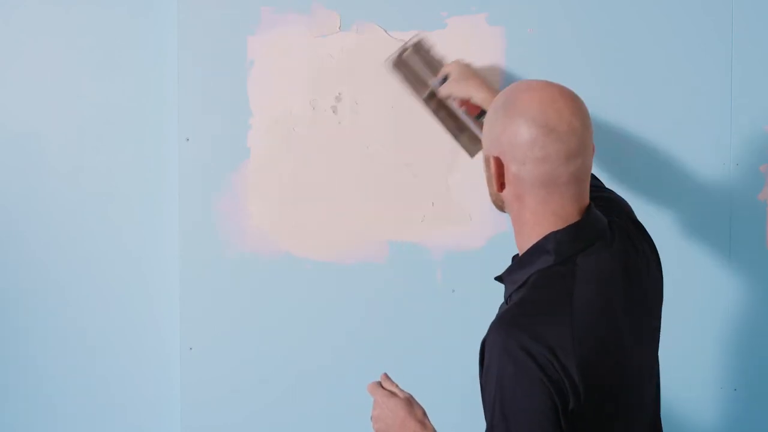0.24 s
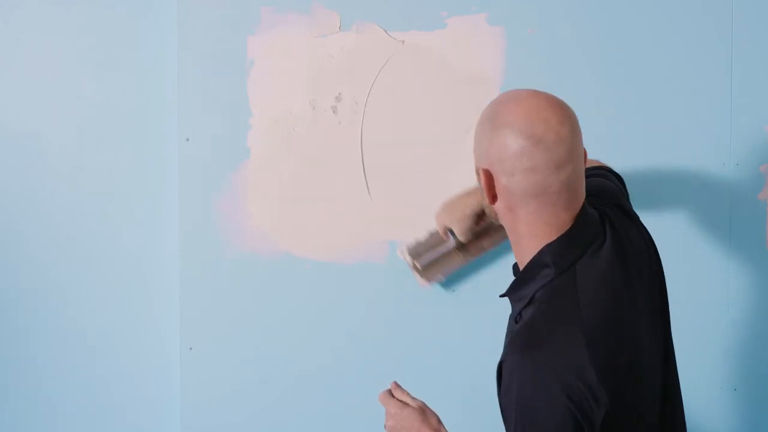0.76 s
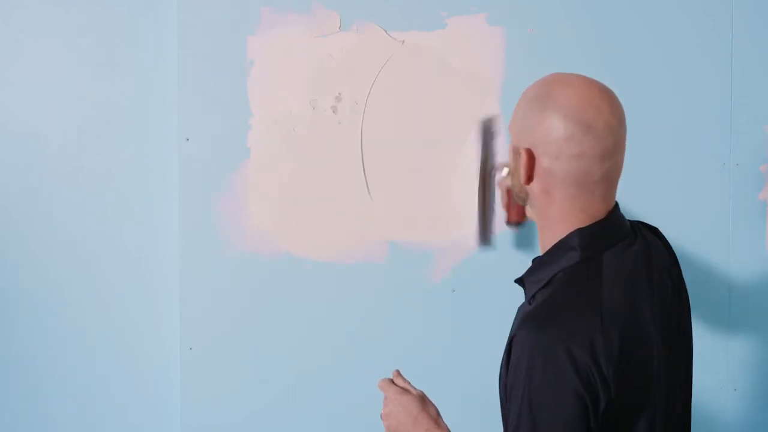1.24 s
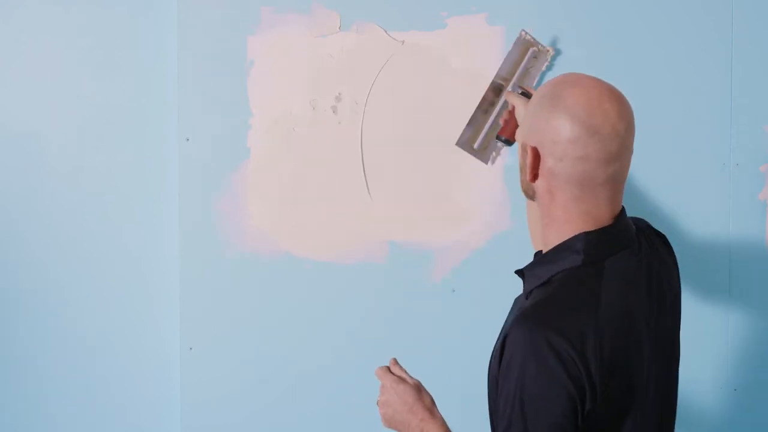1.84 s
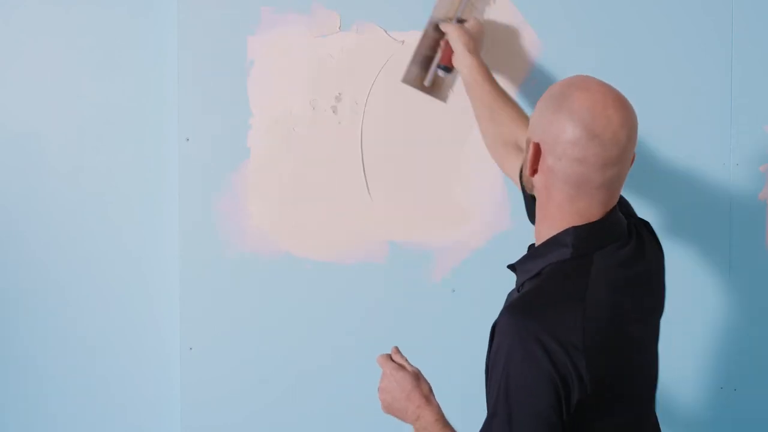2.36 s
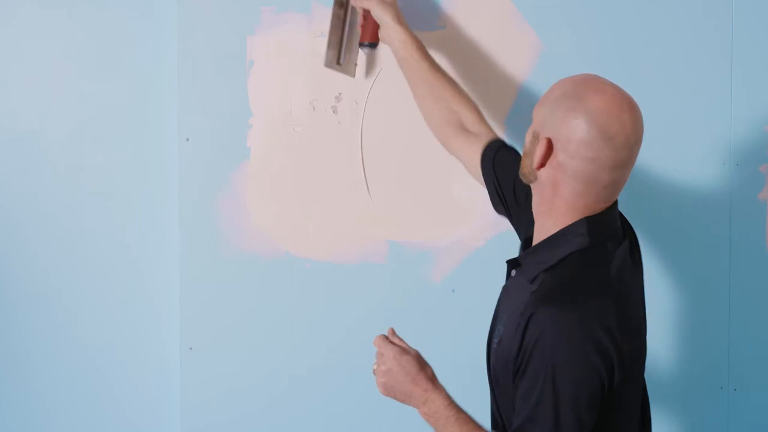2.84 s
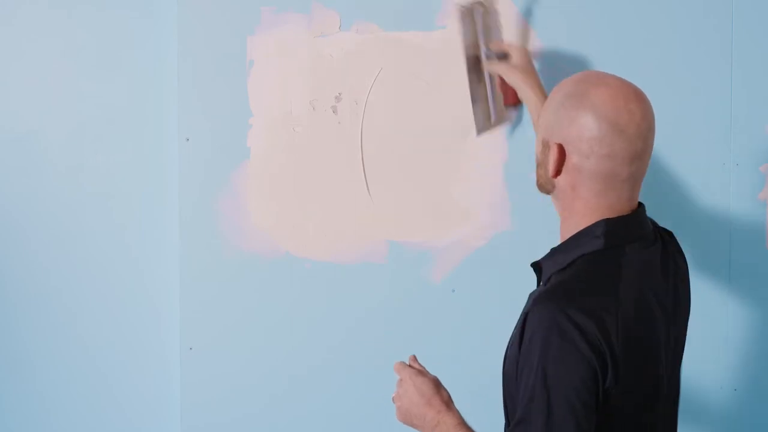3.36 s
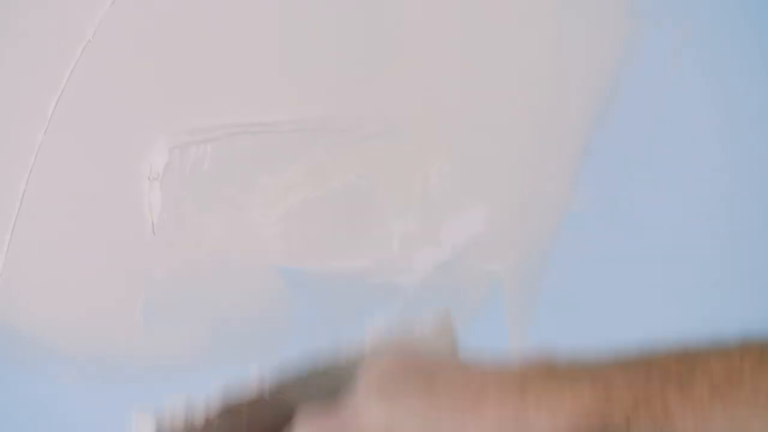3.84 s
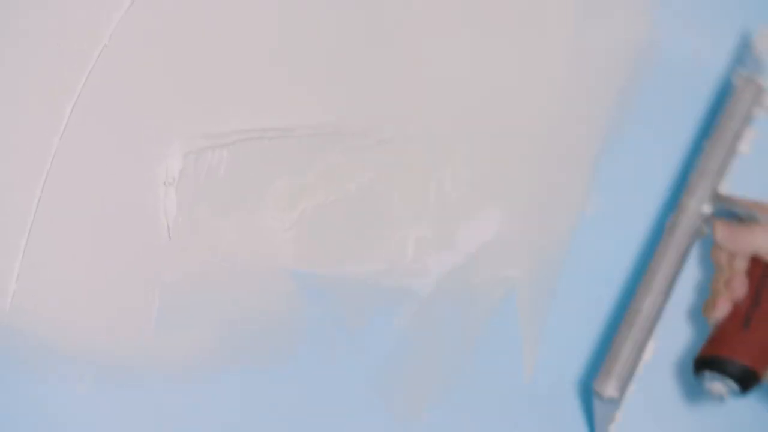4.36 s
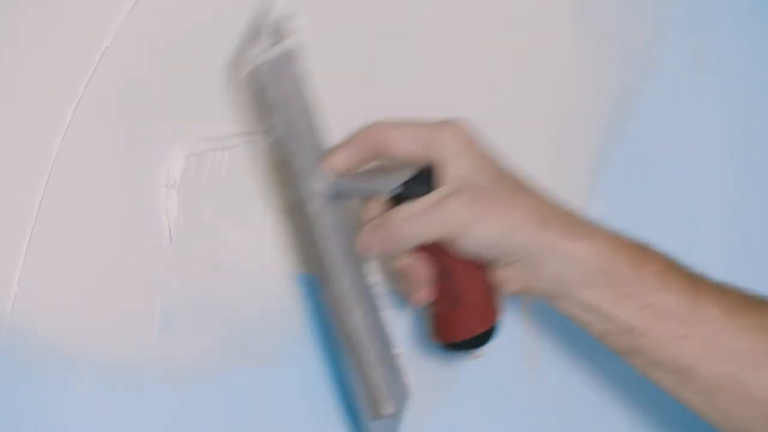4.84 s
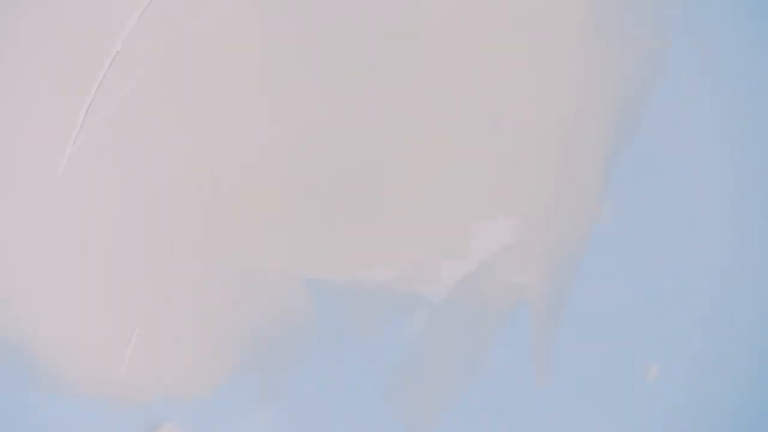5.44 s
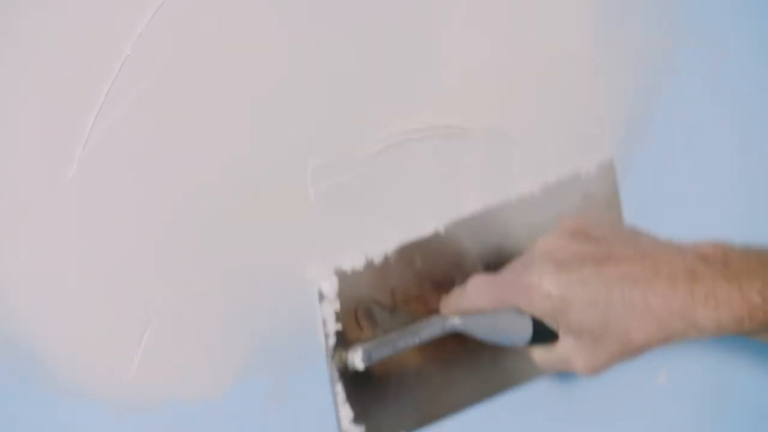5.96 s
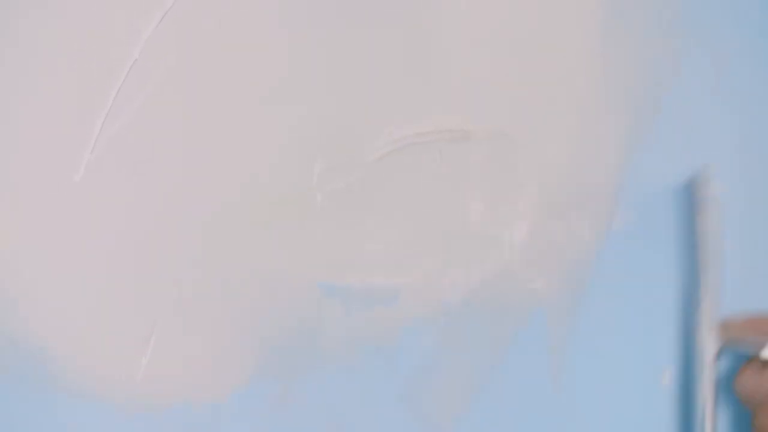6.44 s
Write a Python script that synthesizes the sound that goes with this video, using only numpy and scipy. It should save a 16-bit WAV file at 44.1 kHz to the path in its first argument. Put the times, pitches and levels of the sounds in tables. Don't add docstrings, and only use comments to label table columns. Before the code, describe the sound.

In a bare, lightly echoing room, a steel trowel scrapes wet filler on a hollow wall. A harsh sweep opens, then a softer stroke, a pause, a ringing tap with a board thud, and a dry bright rasp. After a brief dropout come closer flicks, a landing and press, a swipe, another flick and a sharp final slap. One microphone, low ventilation hum beneath.

```python
import sys
import numpy as np
from scipy import signal
from scipy.fft import rfft, irfft, next_fast_len
from scipy.io import wavfile
from scipy.ndimage import uniform_filter1d, map_coordinates

SR = 44100
rng = np.random.default_rng(int(sys.argv[2]) if len(sys.argv) > 2 else 0)


def bounce(signal):
    frames = np.transpose(np.atleast_2d(signal))
    limited = np.clip(frames, -1, 1)
    pcm = np.round(limited * 32767).astype(np.int16)
    wavfile.write(sys.argv[1], SR, pcm)


def natural_amplitude(level_db):
    exponent = np.asarray(level_db, float) / 20
    return 10 ** exponent


N = 295029


def unit(x):
    return x / np.sqrt(np.mean(x ** 2) + 1e-20)


def along(points, hz):
    f, v = np.transpose(points)
    return np.interp(np.log(hz + 1), np.log(f + 1), v)


def curves(rows):
    s, *columns = np.transpose(rows)
    return [np.interp(np.arange(N) / SR, s, column) for column in columns]


def wobble(rate):
    knots = rng.standard_normal(int(N * rate / SR) + 4)
    return map_coordinates(knots, [np.arange(N) * rate / SR])


def filtered(x, response):
    m = 2 * next_fast_len(N // 2 + SR // 4)
    return irfft(rfft(x, m) * response(np.fft.rfftfreq(m, 1 / SR)), m)[..., :N]


def noise_shaped(points):
    return unit(filtered(rng.standard_normal(N), lambda f: natural_amplitude(along(points, f))))


def resonances(modes):
    def response(f):
        power = 0
        for hz, width, db in modes:
            power = power + natural_amplitude(2 * db) * (f * width) ** 2 / ((hz * hz - f * f) ** 2 + (f * width) ** 2)
        cepstrum = irfft(.5 * np.log(power + 1e-12))
        half = len(cepstrum) // 2
        folded = np.r_[cepstrum[0], 2 * cepstrum[1:half], np.zeros(len(cepstrum) - half)]
        return np.exp(rfft(folded))
    return response


def skirt(lo_hz, hi_hz):
    sos = signal.butter(3, [lo_hz, hi_hz], "bandpass", fs=SR, output="sos")
    return lambda f: signal.sosfreqz(sos, f, fs=SR)[1]


def scrape():
    # hz, width_hz, level_db
    flex_modes = [(646, 130, -4.5), (706, 31, 1.5), (753, 140, -0.5), (899, 64, 0.5), (995, 40, -0.5),
                  (1090, 50, 2.5), (1200, 120, 1), (1210, 52, 2), (1370, 210, -2.5)]
    edge_modes = [(2160, 520, -2), (2270, 150, -2), (2530, 200, -4)]
    tip_modes = [(2660, 86, -6), (2890, 310, -2.5), (3140, 450, -1), (3540, 180, -9.5)]
    grit_modes = [(3860, 420, 0.5), (4200, 220, -4), (4590, 710, 1), (4650, 41, 0.5), (4980, 63, -0.5),
                  (5240, 83, 0), (5500, 51, -6.5), (5735, 230, 1), (6200, 56, -4), (6140, 45, -2),
                  (6440, 1800, -3)]
    # hz, db_per_hz
    wet_hiss = [(5000, -35), (7000, -3), (8500, -1), (10500, -4.5), (12500, -11.5), (15000, -15),
                (16500, -35.5)]
    dry_rasp = [(6000, -31), (8500, -8), (11000, -1.5), (14000, 0), (16500, -1.5)]
    bodies = [lambda f: resonances(flex_modes)(f) * skirt(540, 1550)(f),
              lambda f: resonances(edge_modes)(f) * skirt(1500, 2900)(f),
              lambda f: resonances(tip_modes)(f) * skirt(2300, 3800)(f),
              lambda f: resonances(grit_modes)(f) * skirt(3200, 8000)(f),
              lambda f: natural_amplitude(along(wet_hiss, f)),
              lambda f: natural_amplitude(along(dry_rasp, f))]
    shared = unit(grit(spread_db=2.0, catch_db=2.0))
    grid = np.linspace(0, SR / 2, 4097)
    out = np.zeros(N)
    for level_db, body in zip(contact(), bodies):
        own = unit(grit(spread_db=2.0, catch_db=-0.98))
        force = unit(shared + 1.24 * own)
        body_rms = np.sqrt(np.mean(np.abs(body(grid)) ** 2))
        out += filtered(force * natural_amplitude(level_db), body) / body_rms
    return out


def contact():
    # time_s, speed_db, blade_pressure_db, compound_wetness_db
    sweep_in = [(0, -57, 17.5, 1.5), (.033, -56.5, 8, 1.5), (.076, -37.5, 6, -4), (.129, -26, -5, -3),
                (.185, -31, -4.5, -2.5), (.255, -35.5, -1, -4.5), (.292, -42, -4.5, -10.5),
                (.32, -61.5, 0, -19.5), (.45, -61, 0, -5.5)]
    sweep_out = [(.7, -57, 2, 1.5), (.735, -48.5, -2, -0.5), (.801, -42, -5.5, 1.5), (.855, -35, -11.5, 1),
                 (.92, -43, -9, -1), (.975, -36.5, -5, -5.5), (.999, -38.5, -3.5, -9.5),
                 (1.03, -52, 0, -22), (1.12, -60, -3, -11)]
    settle = [(1.9, -86, 2, 4), (1.935, -63, 12, -2), (1.975, -53.5, 2.5, -5), (2.021, -45, -8, 1.5),
              (2.08, -54.5, -5, 0), (2.14, -63, -6, 1), (2.25, -65, 0.5, 1.5)]
    dry_pull = [(2.555, -57.5, -7.5, -3), (2.595, -48.5, -16.5, 0), (2.626, -37.5, -14.5, -5),
                (2.661, -39.5, -2.5, -6), (2.694, -27.5, -6.5, -19.5), (2.766, -21, -13, -30),
                (2.805, -22, -16.5, -44), (2.835, -45, -9.5, -15)]
    first_flick = [(3.75, -62, -20, 3), (3.845, -56, -13, 0), (3.876, -46.5, -23, -2),
                   (3.917, -33.5, -17.5, 2.5), (3.967, -38, -11, 1), (3.995, -31.5, -0.5, -6.5),
                   (4.03, -25, -5, -6), (4.046, -22, -4.5, -16), (4.075, -46, -5, -14)]
    press = [(4.451, -63.5, 11, -6), (4.476, -43, 10.5, -7.5), (4.53, -34, 5.5, -1.5),
             (4.594, -29, 1.5, -1), (4.64, -27.5, -3, -4.5), (4.676, -44, 0.5, -11.5)]
    drag = [(4.765, -52, -20, -0.5), (4.793, -42.5, 3.5, -0.5), (4.816, -46.5, 5, -8.5),
            (4.85, -56.5, 3.5, 2), (4.91, -56, 1, -5), (4.93, -50, 0, 0), (5.02, -44.5, 1.5, -7),
            (5.13, -48.5, 0, -8)]
    swipe = [(5.17, -46.5, -8, -7), (5.234, -49, 1.5, -10.5), (5.297, -28, -7.5, -19),
             (5.345, -24, -9.5, -19.5), (5.376, -27.5, -5, -27), (5.415, -49, 0.5, -6)]
    second_flick = [(5.85, -81.5, 11, 3), (6.0, -65.5, -7.5, 0.5), (6.045, -57.5, -12, 4.5),
                    (6.11, -55, -25, 7), (6.2, -38.5, -23.5, 2.5), (6.256, -35, 3, 4),
                    (6.308, -26, 1, -10.5), (6.328, -29, 3, -8), (6.355, -50.5, -15.5, -8)]
    slap = [(6.639, -61.5, 8, 0.5), (6.671, -56, 22.4, 10), (6.69, -45, 4.6, -10)]
    # edge_db, tip_db, rasp_db
    grips = [(-2.5, -2, -10), (-3.5, 1.5, -14), (-2.5, -2.5, -14), (-3.5, -5.5, -13), (-2, -3, -21.5),
             (-2.5, -2, -13.5), (-3, -3, -14.5), (-4, -2, -15), (-5, -2.5, -23), (-3.5, -3, -13.5)]
    # start_s, hold_s, speed_db, pressure_db, wetness_db
    brush_table = [(0.568, 0.13, -58, 1, -0.5), (2.424, 0.041, -58.5, -9, 2.5),
                   (3.071, 0.049, -68.5, 3, 2.5), (3.128, 0.13, -71, -3, 5), (3.439, .01, -62, -5, -9),
                   (3.635, 0.11, -69.5, -8, 3.5)]
    # edge_db, tip_db, rasp_db
    brush_grip = (-3, -3, -20.5)
    approach_db_per_s, trail_db_per_s = 447, 71.5
    edge_pressure = 0.43
    rasp_full_db, rasp_steep = -38.5, 2.7

    strokes = [sweep_in, sweep_out, settle, dry_pull, first_flick, press, drag, swipe, second_flick, slap]
    brushes = [[(s, *rest), (s + hold, *rest)] for s, hold, *rest in brush_table]
    all_grips = list(grips) + [brush_grip] * len(brushes)
    t, levels = np.arange(N) / SR, []
    for rows, (edge_db, tip_db, rasp_db) in zip(strokes + brushes, all_grips):
        speed, pressure, wetness = curves(rows)
        speed = speed - approach_db_per_s * np.maximum(rows[0][0] - t, 0)
        speed = speed - trail_db_per_s * np.maximum(t - rows[-1][0], 0)
        chatter = speed + edge_pressure * pressure
        rasp = rasp_full_db + rasp_db - rasp_steep * np.maximum(rasp_full_db - speed, 0)
        levels.append([speed + pressure, chatter + edge_db, chatter + tip_db, speed, speed + wetness, rasp])
    return np.max(levels, axis=0)


def grit(spread_db, catch_db):
    sizes = natural_amplitude(spread_db * rng.exponential(size=N)) * rng.standard_normal(N)
    return sizes * natural_amplitude(catch_db * (wobble(45) + wobble(220)))


def song():
    halo_spread, halo_db = 2.2, -7
    out = np.zeros(N + SR)
    voices = air_wedges() + afterrings() + whistles() + squeaks() + singing_modes() + booms()
    for start, end, first_hz, last_hz, width_hz, db, loss_db in voices:
        length_s = end - start
        u = np.arange(round(length_s * SR)) / (length_s * SR)
        turns = u * length_s * max(width_hz, first_hz / 70)
        sway = []
        for core, halo in rng.standard_normal((2, 2, 900)):
            haze = map_coordinates(halo, [halo_spread * turns])
            sway.append(map_coordinates(core, [turns]) + natural_amplitude(halo_db) * haze)
        phase = 2 * np.pi * np.cumsum(first_hz + (last_hz - first_hz) * u) / SR
        swell = np.sin(np.pi * u) ** .55 * natural_amplitude(db - loss_db * u)
        out[round(start * SR):][:len(u)] += swell * (sway[0] * np.cos(phase) + sway[1] * np.sin(phase))
    return out[:N] * natural_amplitude(2 * wobble(160))


def air_wedges():
    # start_s, end_s, first_hz, last_hz, level_db
    wedges = [(3.864, 3.905, 3100, 2500, -45), (3.895, 3.985, 3250, 3000, -38),
              (3.899, 3.975, 2590, 2450, -41), (3.96, 4.042, 2750, 2050, -24.5),
              (4.002, 4.055, 4080, 3800, -31), (6.114, 6.21, 3480, 2600, -47),
              (6.199, 6.275, 3095, 2500, -34), (6.259, 6.335, 2450, 1950, -32),
              (6.293, 6.328, 3900, 3700, -30)]
    return [(a, b, hz, last, .2 * hz, db, 0) for a, b, hz, last, db in wedges]


def afterrings():
    # start_s, end_s, first_hz, last_hz, level_db
    lifts = [
        (2.819, 3.265, 2300, 2500, -56),
        (4.05, 4.326, 2180, 2250, -48),
    ]
    return [(a, b, hz, last, .06 * hz, db, 22) for a, b, hz, last, db in lifts]


def whistles():
    # start_s, end_s, first_hz, last_hz, level_db
    swings = [
        (1.53, 1.63, 8200, 10200, -88),
        (1.6, 1.71, 14100, 15000, -92),
        (1.7, 1.8, 15000, 11200, -92),
        (5.55, 5.8, 13000, 9500, -90),
    ]
    return [(a, b, hz, last, .015 * hz, db, 0) for a, b, hz, last, db in swings]


def squeaks():
    # start_s, end_s, first_hz, level_db
    stiffenings = [(0.097, 0.169, 1075, -30.5), (.16, 0.206, 827, -31), (0.089, 0.157, 3080, -30),
                   (0.574, 0.623, 900, -55), (2.638, 2.729, 640, -40.5), (4.915, 5.14, 474, -57)]
    return [(a, b, hz, 1.09 * hz, .15 * hz, db, 0) for a, b, hz, db in stiffenings]


def singing_modes():
    # start_s, end_s, pitch_hz, width_hz, level_db
    moments = [(0.036, 0.055, 2270, 680, -39.5), (0.067, 0.275, 1660, 490, -41),
               (0.765, 0.8, 1680, 207, -46), (.59, .73, 990, 55, -52), (.72, 0.824, 1020, 80, -52),
               (.69, 0.75, 2700, 194, -53), (.84, 0.914, 3300, 500, -45.5), (.784, 0.811, 517, 170, -50.5),
               (0.864, 0.911, 490, 99, -50.5), (.95, 1.022, 496, 152, -51), (0.966, 1.019, 1065, 64, -45.5),
               (1.683, 1.686, 2470, 2900, -63), (1.957, 1.968, 3100, 1300, -35),
               (1.9565, 1.9605, 4500, 2200, -47), (1.99, 2.025, 2950, 500, -44.5),
               (1.961, 1.984, 1200, 204, -35), (1.992, 2.09, 1605, 492, -50.5),
               (2.68, 2.84, 2280, 130, -43), (2.72, 2.81, 5700, 1600, -27.5),
               (4.527, 4.565, 1600, 620, -33), (4.527, 4.54, 3700, 490, -31.5), (3.44, 3.5, 720, 120, -74),
               (3.927, 3.995, 802, 242, -43.5), (3.99, 4.062, 770, 160.7, -32),
               (4.03, 4.063, 1600, 100, -34), (.09, .2, 2248, 430, -31.5), (6.035, 6.7, 2220, 310, -59),
               (6.631, 6.654, 1150, 220, -44.5), (3.44, 3.5, 4500, 900, -62), (1.99, 2.14, 490, 200, -54),
               (.1, .19, 6300, 500, -36)]
    return [(a, b, hz, hz, width, db, 0) for a, b, hz, width, db in moments]


def booms():
    # start_s, end_s, pitch_hz, level_db
    leans = [(0, 0.087, 327, -54.5), (1.081, 1.203, 120, -58.5), (1.683, 1.703, 150, -55),
             (1.941, 2.023, 367, -42.5), (1.95, 2.058, 112, -50.5), (2.74, 2.863, 121.8, -50),
             (3.632, 3.686, 165, -46), (3.69, 3.82, 139.6, -59), (4.46, 4.576, 121.7, -41.5),
             (4.458, 4.61, 329.6, -46), (4.919, 5.413, 360.6, -62.5), (5.891, 5.986, 268, -55.5),
             (5.888, 6.026, 150, -54)]
    return [(a, b, hz, hz, .548 * hz, db, 0) for a, b, hz, db in leans]


def knocks():
    # time_s, click_db, click_hz, ring_db
    ticks = [(1.097, -39, 12120, -60), (1.4497, -56, 11000, -77.5), (1.51, -55, 8050, -75),
             (1.6184, -54, 7500, -68), (1.6841, -39.5, 10300, -56), (2.3202, -53, 8970, -72),
             (2.999, -55.5, 12980, -75.5), (3.122, -60, 14000, -80), (3.151, -50.5, 9000, -76),
             (3.7829, -38, 10030, -78), (4.92, -49, 9000, -39), (6.012, -45, 12060, -77),
             (6.5176, -39.5, 11000, -70)]
    # time_s, click_db, ring_db, thud_db, thud_hz
    landings = [(1.936, -52, -37.5, -38, 203), (1.9575, -38, -25, -32.5, 193),
                (1.9631, -55, -25.5, -38.5, 331), (3.6281, -44.5, -71, -41, 155),
                (4.445, -51, -39, -44, 200), (4.473, -31, -22.5, -37.5, 123), (5.894, -70, -70, -45, 146),
                (5.9047, -68, -57, -36.5, 147), (6.6324, -41, -47, -41, 116.1),
                (6.6541, -29, -15, -26, 273)]
    # hz, level_db, t60_s
    blade_modes = [(586, 5.5, 0.015), (745, 3, 0.016), (1054, 1, 0.04), (1205, -4.5, 0.024),
                   (1845, -8, 0.025), (2390, -13.5, 0.035), (2910, -13.5, 0.034), (3256, -9.5, 0.015),
                   (4070, -8, 0.014), (5900, -12, 0.014)]
    # multiple_of_thud_hz, level_db, t60_s
    board_modes = [(.75, -6.5, 0.09), (1, 8.5, 0.051), (1.35, 0.5, 0.07), (1.9, -4.5, 0.05),
                   (2.7, -10.5, 0.059), (3.8, -31, .035)]
    # hz, db_per_hz
    smack_colour = [(60, -40), (150, -6.5), (400, 1.5), (1200, -2), (3000, -13.5), (6000, -18.5),
                    (12000, -35.5)]
    landing_click_hz = 9500
    tick_thud_db, tick_thud_hz = -18, 138
    smack_db, smack_t60_s = -10, 0.054

    out, t = np.zeros(N + SR), np.arange(SR // 4) / SR
    splash = noise_shaped(smack_colour)
    hits = [(s, db, hz, ring, db + tick_thud_db, tick_thud_hz) for s, db, hz, ring in ticks]
    hits += [(s, db, landing_click_hz, *rest) for s, db, *rest in landings]
    for s, click_db, click_hz, ring_db, thud_db, thud_hz in hits:
        at = round(s * SR)
        crackle = uniform_filter1d(rng.standard_normal(len(t)), size=6) * np.sin(2 * np.pi * click_hz * t)
        click = crackle * natural_amplitude(click_db + 8.5 - 60 * t / 0.004) * (1 - np.exp(-t / 0.00015))
        ring = natural_amplitude(ring_db - 6) * ringing(blade_modes, t, attack=.0009)
        thud = natural_amplitude(thud_db + 1.5) * ringing(board_modes, t, attack=0.0066, scale=thud_hz)
        smack_fade = natural_amplitude(ring_db + smack_db - 60 * t / smack_t60_s) * (1 - np.exp(-t / 0.0016))
        smack = np.roll(splash, -at)[:len(t)] * smack_fade
        out[at:][:len(t)] += click + ring + thud + smack
    return out[:N]


def ringing(modes, t, attack, scale=1):
    chance = rng.standard_normal((len(modes), 2)) * [2.5, 1.5]
    out = np.zeros(len(t))
    for (hz, db, t60), (more_db, turn) in zip(modes, chance):
        out += natural_amplitude(db + more_db - 60 * t / t60) * np.sin(2 * np.pi * scale * hz * t + turn)
    return out * (1 - np.exp(-t / attack))


def room(x):
    # hz, t60_s
    decay = [(150, 0.92), (530, 0.63), (1390, 0.51), (3680, 0.54), (8000, 0.42), (11500, 0.48),
             (14000, 0.38)]
    out, step = np.zeros(N + 2 * SR), SR // 3
    fade = np.hanning(2 * step + 1)[:-1]
    x = np.pad(x, (step, 2 * step))
    for i in range(0, N + step, step):
        hz, t, z = signal.stft(rng.standard_normal(SR * 3 // 4), SR, nperseg=256)
        tail = signal.istft(z * natural_amplitude(-60 * t / along(decay, hz)[:, None]), SR, nperseg=256)[1]
        wet = signal.fftconvolve(x[i:i + 2 * step] * fade, tail / np.linalg.norm(tail))
        out[i:i + len(wet)] += wet
    late = step - 200
    return out[late:late + N]


def background():
    # time_s, level_db
    push = [(0.0, -60), (0.8, -64), (1.02, -59.5), (1.38, -66.5), (1.86, -63.5), (2.1, -57), (2.44, -59.5),
            (2.89, -56), (3.33, -63.5), (3.6, -67), (3.86, -65.5), (4.01, -63.5), (4.28, -63.5),
            (4.66, -60.5), (4.84, -61), (5.92, -61), (6.26, -65.5), (6.69, -59)]
    # hz, db_per_hz
    rumble_colour = [(15, -58), (40, -33), (70, -9), (130, -1.5), (309, -12.5), (442, -15), (600, -21.5),
                     (900, -82)]
    air_colour = [(250, -47.5), (471, -1.5), (955, -1.5), (1750, -1.5), (3640, -9), (5830, -12.5),
                  (12300, -15), (13500, -33.5)]
    # hz, rms_db
    lamps = [(5701, -91), (6002, -91), (6298, -97), (8253, -95), (9001, -94), (9900, -94)]
    t = np.arange(N) / SR
    steady = filtered(rng.standard_normal(N), lambda f: natural_amplitude(along(rumble_colour, f)))
    rumble = unit(steady * natural_amplitude(1.2 * wobble(7.0)))
    hiss = noise_shaped(air_colour)
    lines = sum(natural_amplitude(db + 1.6 + 2.5 * wobble(6)) * np.sin(2 * np.pi * hz * t) for hz, db in lamps)
    return natural_amplitude(curves(push)[0]) * rumble + natural_amplitude(-72.5) * hiss + lines


def scene():
    trowel = scrape() + song() + knocks()
    trowel = filtered(trowel, skirt(68, 18000))
    return np.tile(trowel + natural_amplitude(-9.5) * room(trowel) + background(), (2, 1))


def top_cut(x):
    return signal.sosfilt(signal.butter(12, 15970, fs=SR, output="sos"), x)


def record(dry):
    # time_s, gain
    dropout = [
        (3.428, 1),
        (3.432, .03),
        (3.438, .05),
        (3.448, 1),
    ]
    gap = curves(dropout)[0]
    mix = filtered(dry * gap, lambda f: f < 15850)
    return top_cut(mix)


dry = scene()
out = record(dry)
bounce(out)
```